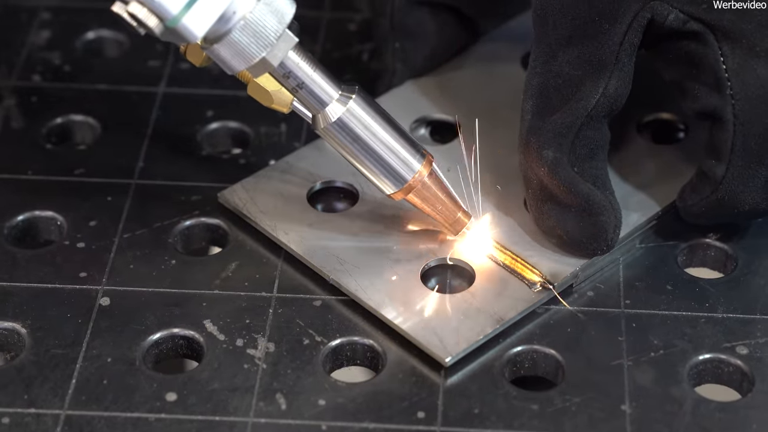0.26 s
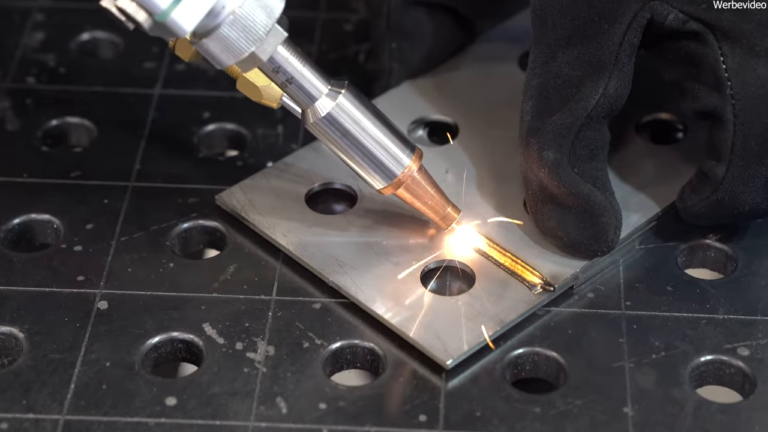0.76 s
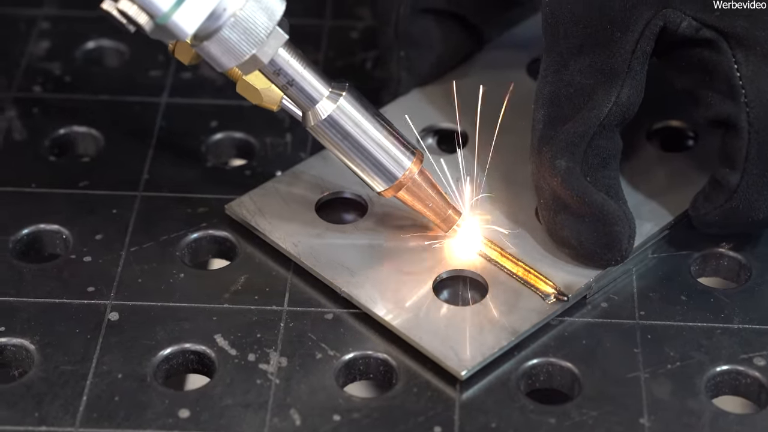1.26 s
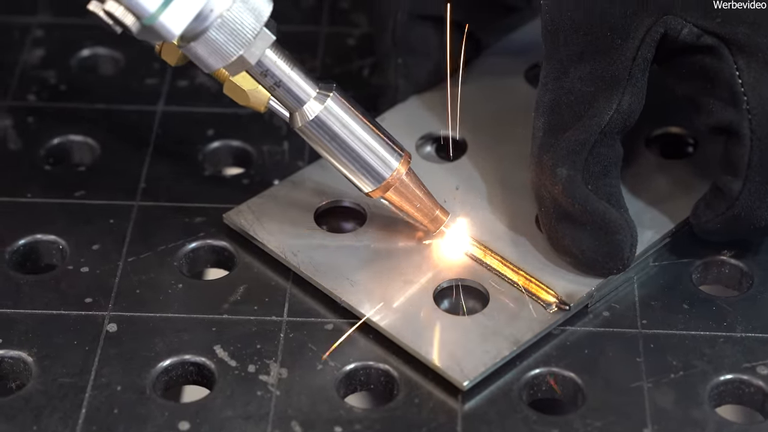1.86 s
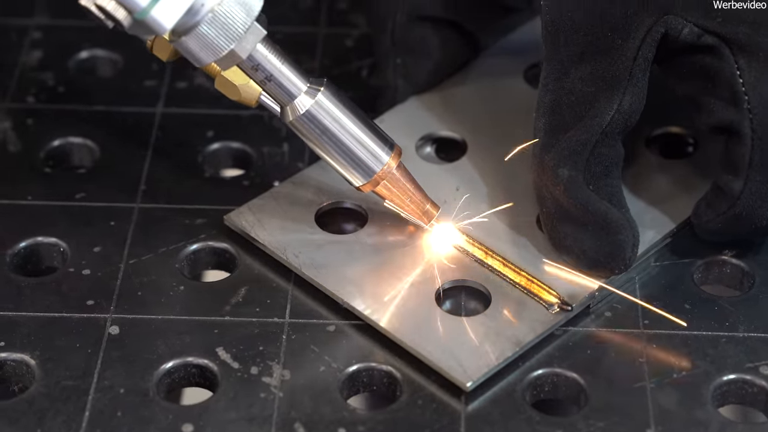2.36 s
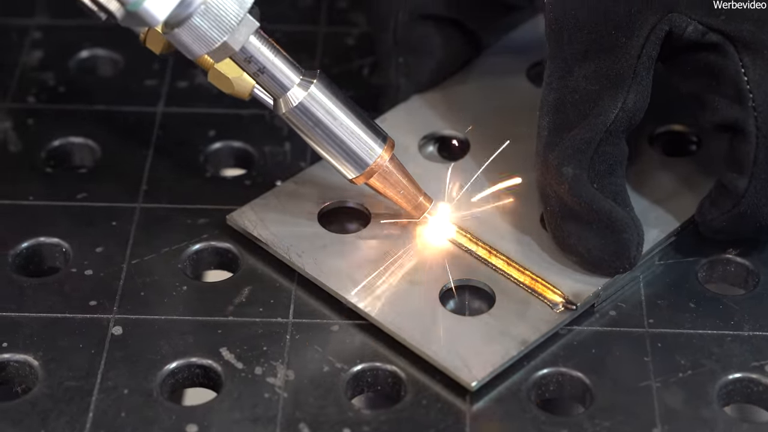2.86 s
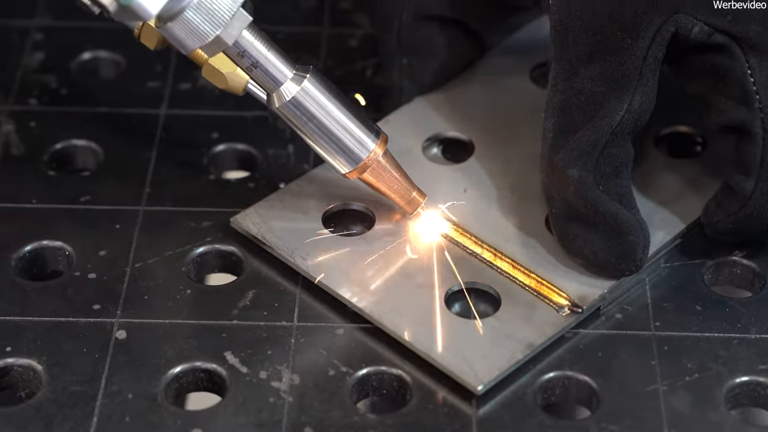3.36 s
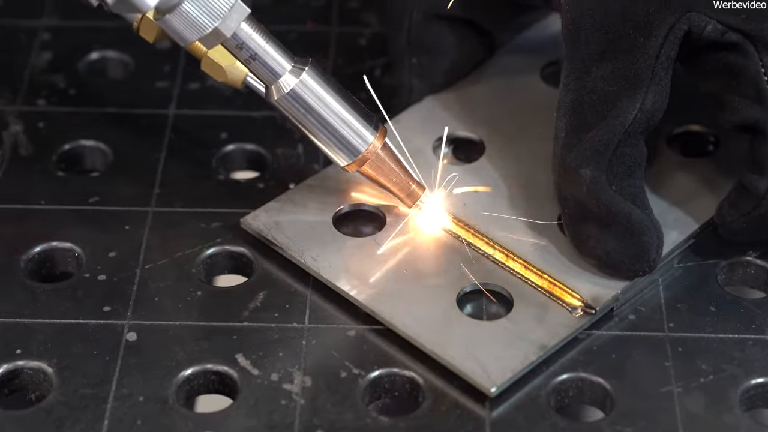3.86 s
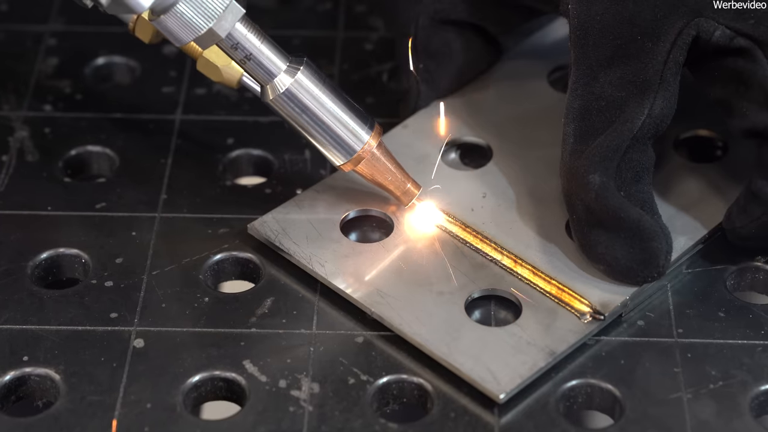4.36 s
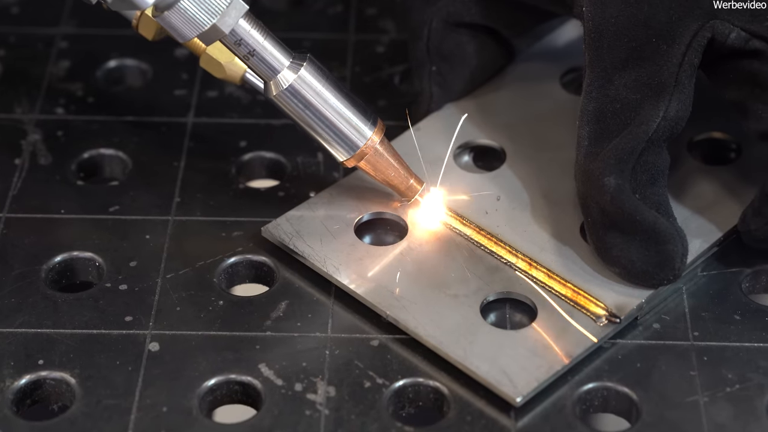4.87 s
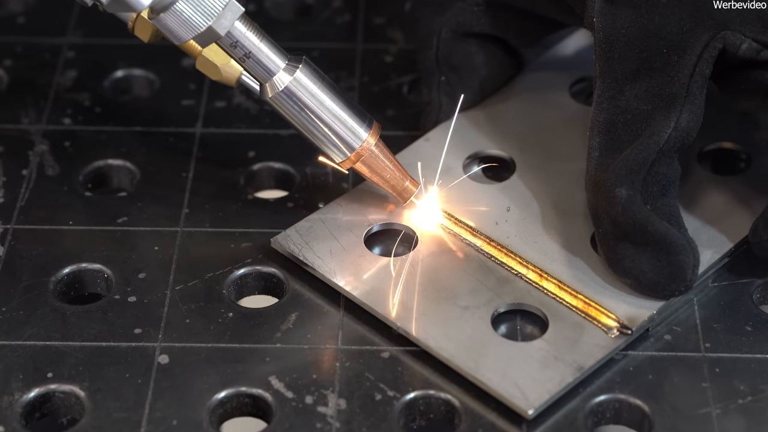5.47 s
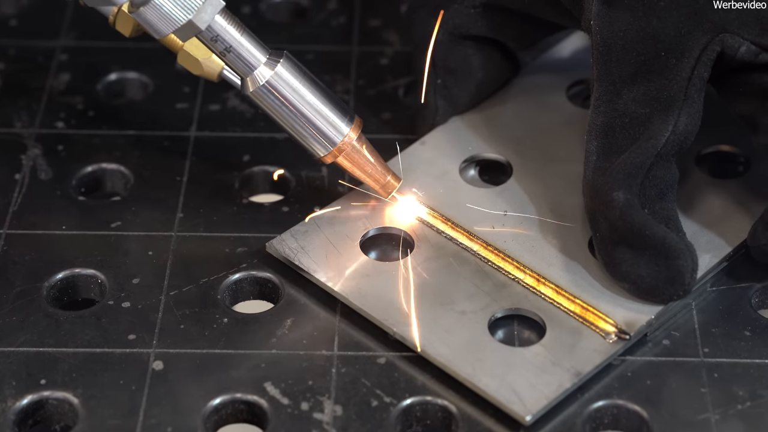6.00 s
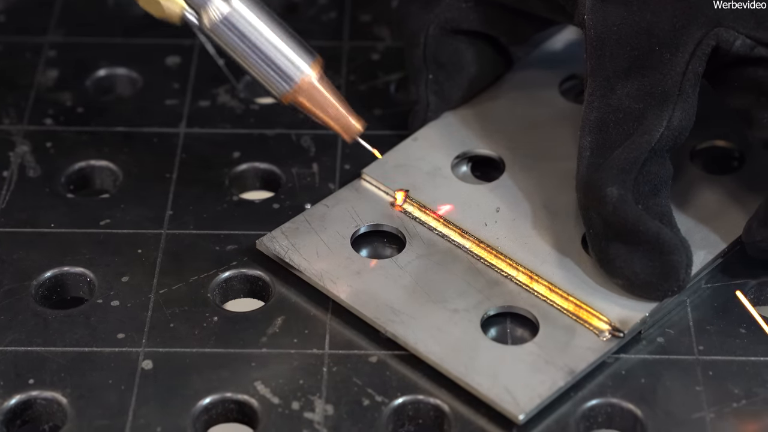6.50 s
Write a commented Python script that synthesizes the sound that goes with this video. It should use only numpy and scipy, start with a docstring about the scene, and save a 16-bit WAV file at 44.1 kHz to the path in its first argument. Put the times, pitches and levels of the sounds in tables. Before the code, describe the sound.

From 0 s a laser weld is in full flow, heard close in one channel: a bright, harsh hiss of metal vapour, concentrated in the high treble, pulsing fifty times a second so it becomes a raspy buzz with a finer flutter inside. Thousands of tiny spatter clicks roughen it into a dense sizzle, with occasional stronger ticks. Strength varies only slightly, dipping near 1.3 and 2.3 s and lifting a little around 3 and 4.2 s. As the nozzle travels, resonances and hollow bands glide, gradually changing the hiss's colour. Underneath are smooth, quiet shielding gas and dull, resonant fan drone with low rumble, swelling gently around 3.7 s. Shop echoes are faint and very short. The jet strengthens slightly towards 6.4 s, then vanishes within milliseconds at about 6.46 s, leaving only soft gas hiss and fans for the last moment.

```python
"""A handheld laser torch welds a seam with filler wire on a steel table in a metal shop.
The laser fires fifty times a second. Its pulses drive a hiss of metal vapour and crackling spatter,
made from noise and random clicks; sliding filters change the colour as the nozzle travels.
Gas hisses smoothly from the nozzle, and fans drone through their ducts, both made from filtered noise.
When the trigger is released, the weld dies away and only shielding gas and fans go on."""
import sys
import numpy as np
from scipy import signal
from scipy.fft import rfft, irfft
from scipy.io import wavfile
from scipy.ndimage import uniform_filter1d

SR = 44100
rng = np.random.default_rng(int(sys.argv[2]) if len(sys.argv) > 2 else 0)


def pcm_store(signal):
    """Save signal as 16-bit PCM."""
    levels = np.round(np.clip(np.atleast_2d(signal), -1, 1) * 32767)
    wavfile.write(sys.argv[1], SR, levels.astype(np.int16).T)


N = 297230
TIME = np.arange(N) / SR   # seconds

# relative spectrum of the fan noise: pitch_hz, level_db
FAN_COLOUR = [(32.0, -12), (48.0, 5), (200.0, -3), (280.0, -2), (520.0, -8.5), (700.0, -1), (850.0, -1),
              (1000.0, -10.5), (1150.0, -4), (1380.0, -3), (1650.0, -16), (2100.0, -13.5), (2650.0, -27),
              (4000.0, -37)]
# resonances and dips of the fan ducts and the shop: pitch_hz, width_hz, lift_db
DUCT_RESONANCES = [(57.2, 14.4, 0), (92.5, 11.4, -9.5), (110, 35, 6.5), (161, 17, 7), (177, 20, 4.5),
                   (213, 13.6, 8.5), (467, 5.3, 9.5), (556, 9, 4.5), (610, 13.5, 7), (762.5, 15.5, 7),
                   (814, 18, 6.5), (874, 12, 8), (1138, 16, 2.5), (2000, 65, 2.5)]
# relative spectrum of the shielding gas hiss: pitch_hz, level_db
GAS_COLOUR = [(1500, -12), (2600, -10), (3400, -2.5), (5000, -3), (6400, -2.5), (8500, -1.5), (10200, -6.5),
              (12500, -12), (14300, -21), (15700, -23)]
# strength of the vapour jet over time: time_s, level_db
JET_LEVEL = [(0.0, -18), (1.3, -19.5), (1.65, -18.5), (2.25, -19.5), (3.05, -17.8), (3.5, -18.8),
             (4.2, -17), (6.1, -18), (6.44, -16)]
# relative spectrum of the jet before the steel colours it: pitch_hz, level_db
JET_COLOUR = [(1000.0, -27), (2300.0, -18.5), (3800.0, -19), (4700.0, -11), (5800.0, -0.5), (7000.0, -4.5),
              (9000.0, 0.5), (11000.0, -2.5), (13000.0, -5), (14500.0, -7), (15700.0, -12)]
# resonances and dips of nozzle, plate and table: pitch_hz, width_hz, start_of_seam_db, end_of_seam_db
NOZZLE_RESONANCES = [(3145, 400, 4.5, 9.5), (3786, 440, 11.5, 5), (4240, 140.0, -6.5, -3.5),
                     (5370, 140, 1.5, 5.5), (6210, 380, 3.5, 4), (6700, 130, -2, 8.5), (6970, 170, 12, -1),
                     (8080, 580, 1.2, 7), (8600, 160, -2, -2), (9350, 950, 5.5, 3), (9970, 280, 2, -16),
                     (10340, 210, 6.5, 4), (10840, 260, -8, -8), (11060, 170, -5, 7.5), (9460, 100, 0, -3),
                     (5200, 150, 1.5, -7)]
# echoes from the plate that lift or cancel a gliding band:
# strongest_s, half_strength_after_s, pitch_hz (when strongest), glide_hz_per_s, width_hz, lift_db
PLATE_REFLECTIONS = [(.48, 1.75, 10520, -400, 610, -12.5), (1.43, 3.4, 12600, -215, 2450, 6.5),
                     (1.92, 0.64, 13780, -35, 2200, -8), (3.05, 0.64, 11580, -395, 775, -15),
                     (3.59, 0.41, 14540, 20, 1320, 4.4), (4.1, 1.04, 9260, -200, 765, -15),
                     (5.12, 1.2, 12440, 210, 1750, 10.5), (5.87, 1.07, 11810, 585, 800, -12),
                     (5.9, 1.67, 5220, 108, 1050, -20), (6.07, .33, 14730, 50, 1400, 7)]

FAN_DB, RUMBLE_DB = -27, -33   # levels before the swell
FAN_SWELL_S, RUMBLE_SWELL_S = 3.7, 3.8   # the fans grow a little louder once, midway
FAN_SWELL_REACH_S, FAN_SWELL_DB = 1.2, 2
TRIGGER_OFF_S = 6.461
PULSE_HZ, WOBBLE_HZ, FIRST_PULSE_S = 50, 125, -.0015
CUTOFF_HZ = 15750


def from_db(db):
    """Turn decibels into a gain."""
    return 10 ** (np.asarray(db) / 20)


def rms_one(x):
    """Scale a sound to an average strength (rms) of 1."""
    return x / np.sqrt(np.mean(x ** 2) + 1e-20)


def drift(rate_hz):
    """Smooth random wandering with rms 1; wanderings faster than the rate are weakened."""
    hz = np.fft.rfftfreq(N, 1 / SR)
    smooth = rfft(rng.standard_normal(N)) / (1 + (hz / rate_hz) ** 2)
    return rms_one(irfft(smooth, N))


def swell(peak_s, reach_s):
    """A smooth rise and fall: 1 at the peak, half as much one reach before and after."""
    return 1 / (1 + ((TIME - peak_s) / reach_s) ** 2)


def coloured(x, spectrum):
    """Give a sound a smooth spectrum, drawn between the table's points."""
    hz, db = np.transpose(spectrum)
    grid_hz = np.fft.rfftfreq(N, 1 / SR)
    curve_db = np.interp(np.log(grid_hz + 1), np.log(hz), db)   # straight lines over log pitch
    return irfft(rfft(x) * from_db(curve_db), N)


def bell(hz, width_hz, db):
    """Filter numbers for one resonance (positive dB) or dip (negative dB)."""
    lift = from_db(db / 2)
    damp = np.tan(np.pi * abs(width_hz) / SR)
    turn = -2 * np.cos(2 * np.pi * hz / SR)
    section = np.array([1 + damp * lift, turn, 1 - damp * lift, 1 + damp / lift, turn, 1 - damp / lift])
    return section / section[3]


def resonate(x, modes):
    """Pass a sound through a chain of fixed resonances and dips."""
    return signal.sosfilt([bell(*mode) for mode in modes], x)


def slide(x, hz, width_hz, db, size=512):
    """A resonance or dip whose centre and strength change, block by block."""
    hz = np.broadcast_to(hz, N)
    out, state = np.zeros(N), np.zeros(2)
    for i in range(0, N, size):
        section = bell(hz[i], width_hz, db[i])
        # keeping the filter's state joins the blocks
        out[i:i + size], state = signal.lfilter(section[:3], section[3:], x[i:i + size], zi=state)
    return out


def fans():
    """Air rushes through resonant ducts above a low rumble."""
    fan_db = FAN_DB + FAN_SWELL_DB * swell(FAN_SWELL_S, FAN_SWELL_REACH_S)
    rumble_db = RUMBLE_DB + FAN_SWELL_DB * swell(RUMBLE_SWELL_S, FAN_SWELL_REACH_S)
    air = resonate(coloured(rng.standard_normal(N), FAN_COLOUR), DUCT_RESONANCES)
    # distance dulls the fans
    distance = signal.butter(2, [18, 7000], "band", fs=SR, output="sos")
    air = signal.sosfilt(distance, air)
    # split off the lows, so that they get their own level
    lows = signal.butter(4, 280, fs=SR, output="sos")
    rumble = signal.sosfiltfilt(lows, air)
    return from_db(fan_db) * rms_one(air - rumble) + from_db(rumble_db) * rms_one(rumble)


def shop(x):
    """Faint diffuse echoes from the table, machines and walls, made with a fading burst of noise."""
    t60_s, first_echo_s, wet_db = .11, .003, -17   # t60: time to fade by 60 dB
    t = TIME[:SR]
    fade = from_db(-60 * t / t60_s)
    tail = rng.standard_normal(SR) * fade * (t > first_echo_s)
    return from_db(wet_db) * signal.fftconvolve(x, tail / np.linalg.norm(tail))[:N]


def shielding_gas(level_db):
    """A smooth, quiet hiss from the nozzle that flows on after the laser stops."""
    return from_db(level_db) * rms_one(coloured(rng.standard_normal(N), GAS_COLOUR))


def gas_on_plate(start_db, hz, width_hz, fall_db_per_s):
    """Gas rushing out under the nozzle's rim on the work adds a lower, unpulsed hiss that slowly wanes."""
    band = signal.butter(2, [hz - width_hz / 2, hz + width_hz / 2], "band", fs=SR, output="sos")
    nozzle_on_work = TIME < TRIGGER_OFF_S
    rush = signal.sosfilt(band, rng.standard_normal(N) * nozzle_on_work)
    return from_db(start_db - fall_db_per_s * TIME) * rms_one(rush)


def spatter(per_s, spread_db):
    """Droplets burst from the melt at random: mostly tiny clicks, a few large."""
    born = rng.random(N) < per_s / SR
    sizes = from_db(spread_db * np.minimum(rng.exponential(1, N), 5))
    signs = rng.choice([-1, 1], N)
    return rms_one(born * sizes * signs)


def boiling(wobble_db, uneven_db, simmer_db):
    """Vapour flow: it leaps up with each laser pulse, sags, and drops to a simmer between pulses."""
    rise_s, on_s, fade_s, sag_db, cooling_s = .0004, .0137, .0016, -2, .0035
    # which pulse each sample belongs to, and the time since that pulse began
    number, age_s = np.divmod(TIME - FIRST_PULSE_S, 1 / PULSE_HZ)
    number = number.astype(int)
    strength_db = uneven_db * rng.standard_normal(number.max() + 1)[number]
    rise = 1 - np.exp(-age_s / rise_s)
    fade = np.exp(-np.maximum(age_s - on_s, 0) / fade_s)
    pulse = rise * fade * from_db(strength_db + sag_db * age_s / on_s)
    # the beam swings across the seam; the melt boils hardest at one of the turning points
    swing = -np.cos(2 * np.pi * WOBBLE_HZ * TIME)
    pulse = pulse * from_db(wobble_db * (swing + swing ** 2))
    # the melt pool heaves at half the pulse rate, so strong and weak pulses alternate
    heave = from_db(1.05 * np.cos(np.pi * PULSE_HZ * (TIME - FIRST_PULSE_S)))
    cooling = np.exp(-np.maximum(TIME - TRIGGER_OFF_S, 0) / cooling_s)
    return np.hypot(pulse, from_db(simmer_db)) * heave * cooling


def along_seam(x):
    """The torch moves at an even speed: resonances shift in strength and reflections come and go."""
    travel = np.minimum(TIME / TRIGGER_OFF_S, 1)   # 0 at the start of the seam, 1 at its end
    for hz, width_hz, start_db, end_db in NOZZLE_RESONANCES:
        x = slide(x, hz, width_hz, start_db + (end_db - start_db) * travel)
    for peak_s, reach_s, hz, glide_hz_per_s, width_hz, db in PLATE_REFLECTIONS:
        gliding_hz = hz + glide_hz_per_s * (TIME - peak_s)
        x = slide(x, gliding_hz, width_hz, db * swell(peak_s, reach_s))
    return x


def weld():
    """Pulsed vapour jet and spatter, coloured by the steel around the moving nozzle."""
    flow = boiling(wobble_db=1.2, uneven_db=0.2, simmer_db=-6.5)
    flutter = from_db(.7 * drift(400))   # the vapour cavity trembles
    hiss = flutter * rng.standard_normal(N)
    crackle = from_db(-6.5) * spatter(per_s=3000, spread_db=2.5)
    jet = along_seam(coloured(flow * (hiss + crackle), JET_COLOUR))
    # the sliding bands change the colour only: the level table sets the slow changes in strength
    power = uniform_filter1d(jet ** 2, size=SR // 4) + 1e-12
    flow_power = uniform_filter1d(flow ** 2, size=SR // 4) + 1e-12
    welding = TIME < TRIGGER_OFF_S
    # after the trigger is released, the last correction is held
    even = np.interp(TIME, TIME[welding], np.sqrt(flow_power / power)[welding])
    time_s, level_db = np.transpose(JET_LEVEL)
    jet = from_db(np.interp(TIME, time_s, level_db)) * rms_one(jet * even)
    return jet + shop(jet)


def scene():
    """Weld, gas and fans at one close microphone."""
    plate_gas = gas_on_plate(start_db=-44.5, hz=3660, width_hz=1500, fall_db_per_s=.5)
    gas = shielding_gas(level_db=-37.5) + plate_gas
    return (weld() + gas + fans())[None]   # one channel


def record(dry):
    """The highest peaks are rounded and the top of the treble is cut steeply."""
    headroom = .75   # rounded peaks stay below this
    rounded = dry / (1 + (dry / headroom) ** 4) ** .25
    treble_cut = signal.ellip(12, .1, 90, CUTOFF_HZ, fs=SR, output="sos")
    return signal.sosfilt(treble_cut, rounded)


dry = scene()
out = record(dry)
pcm_store(out)
```